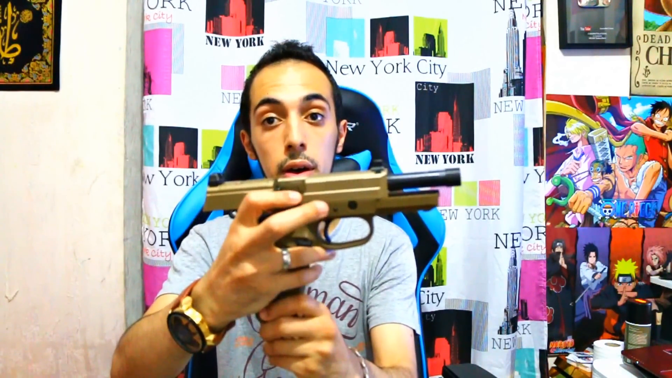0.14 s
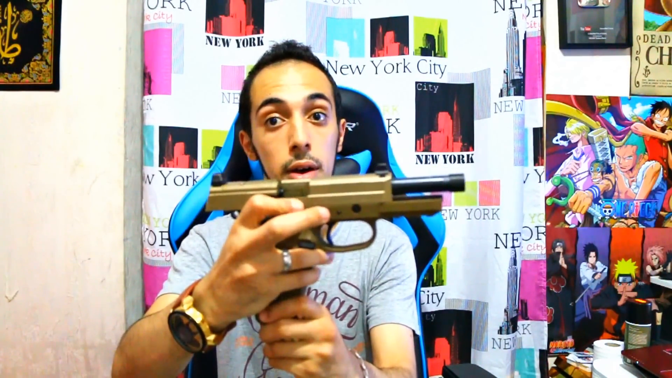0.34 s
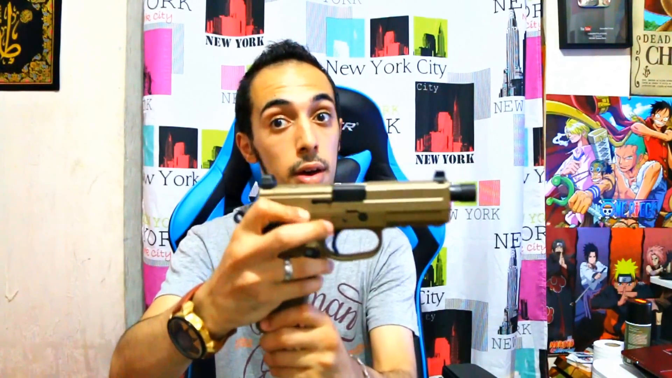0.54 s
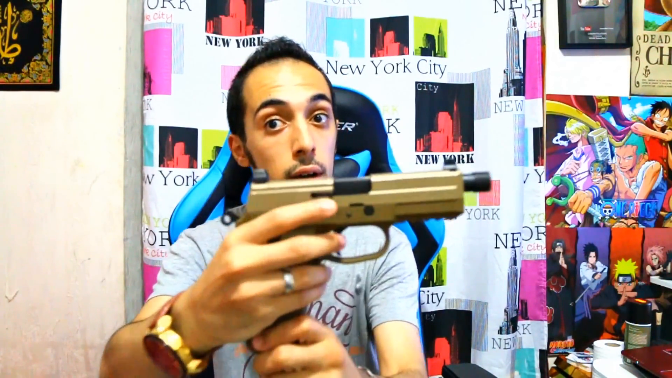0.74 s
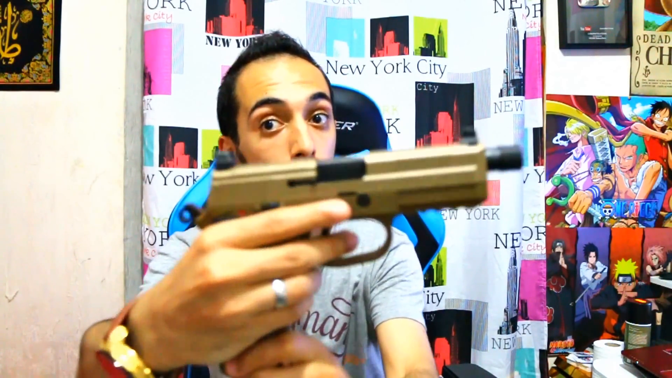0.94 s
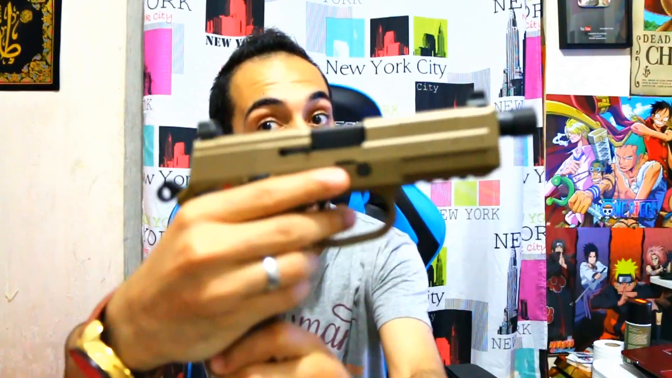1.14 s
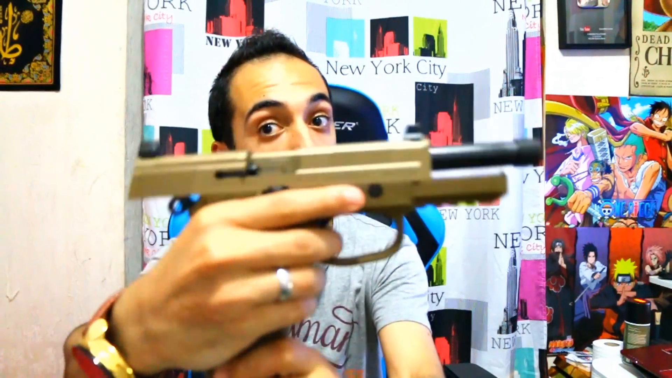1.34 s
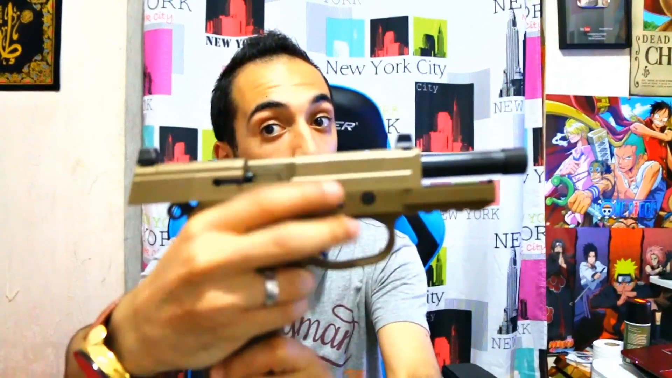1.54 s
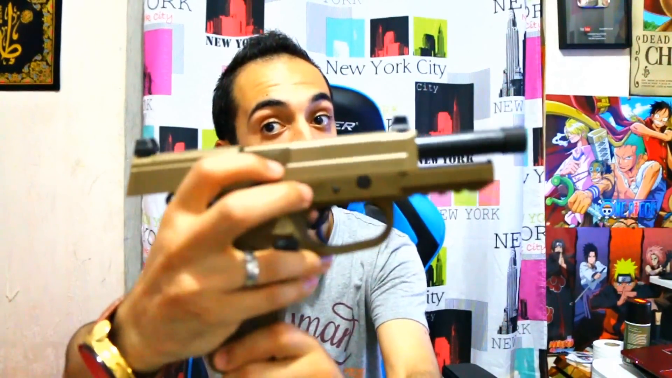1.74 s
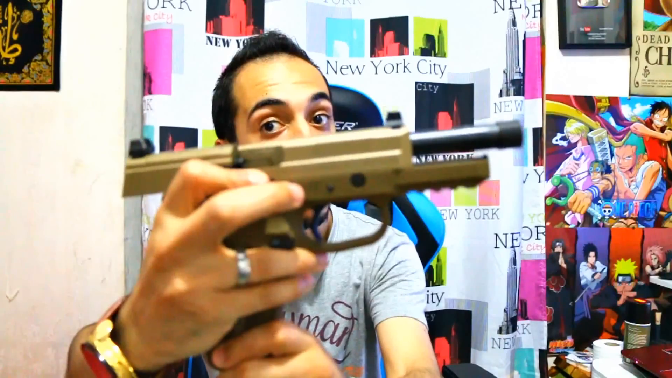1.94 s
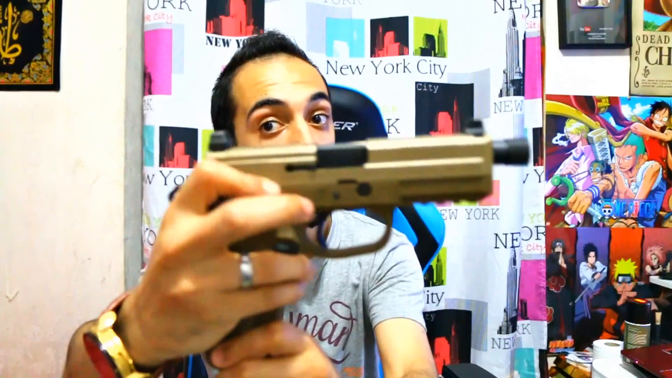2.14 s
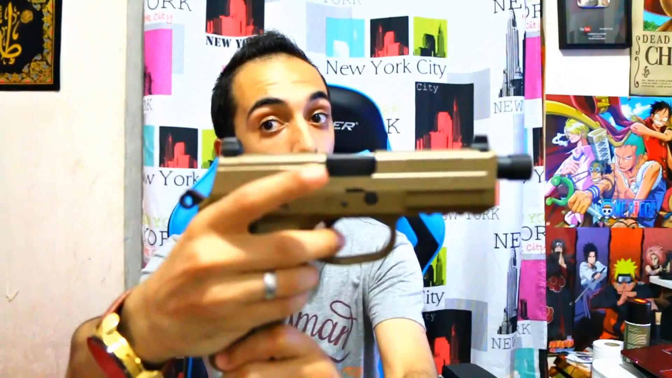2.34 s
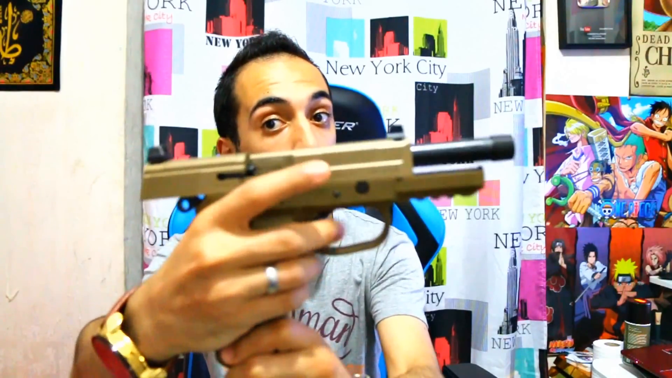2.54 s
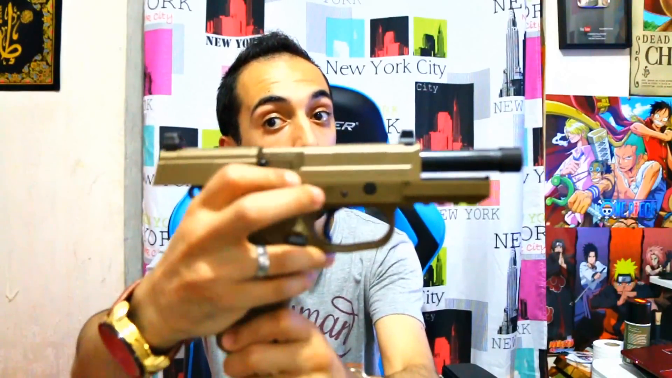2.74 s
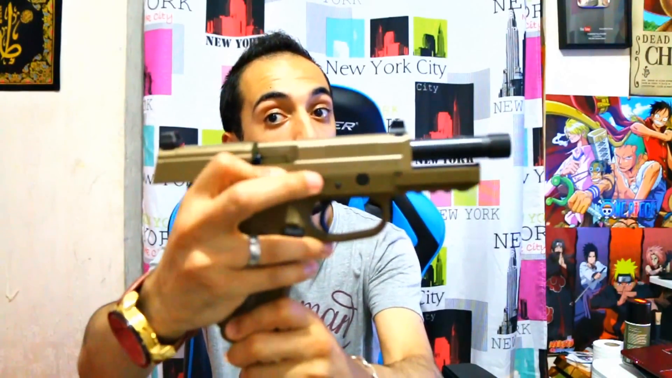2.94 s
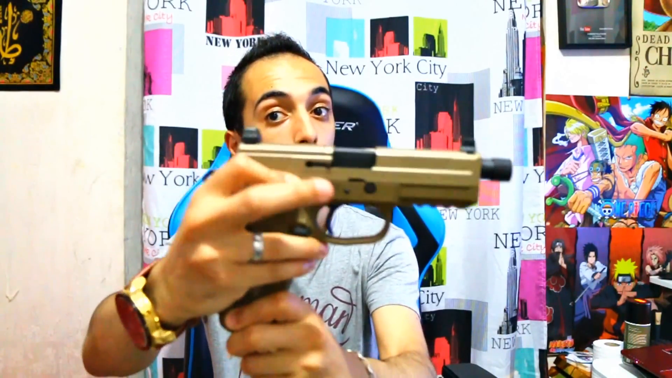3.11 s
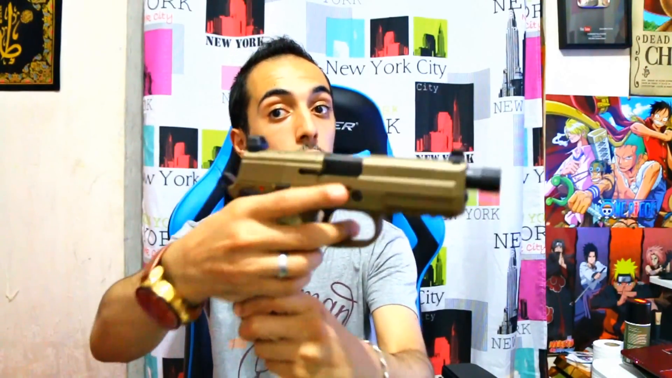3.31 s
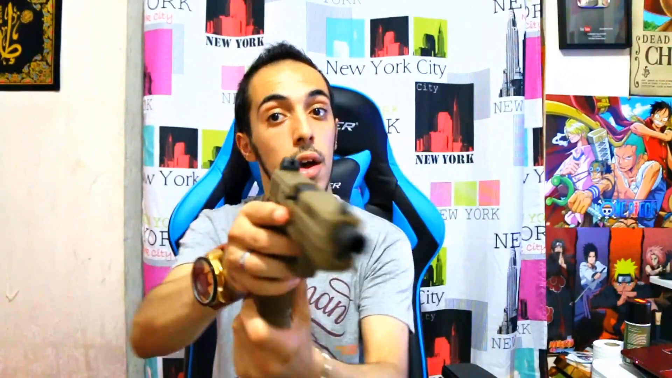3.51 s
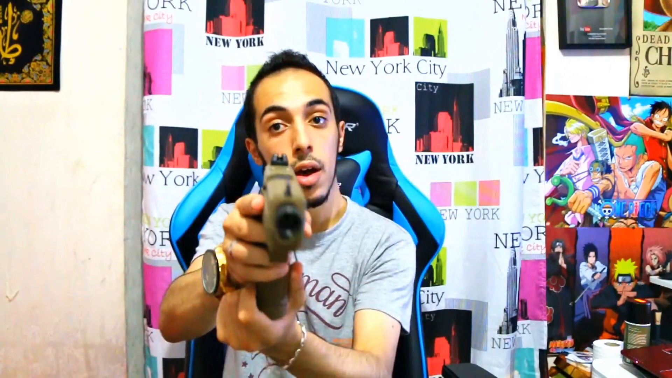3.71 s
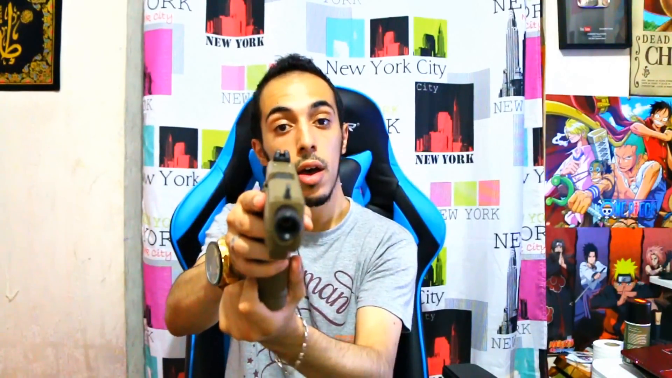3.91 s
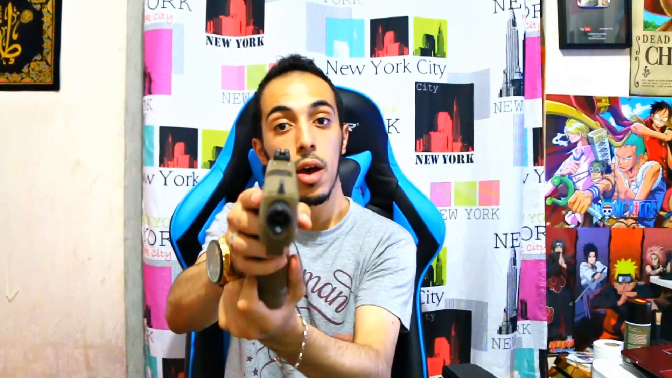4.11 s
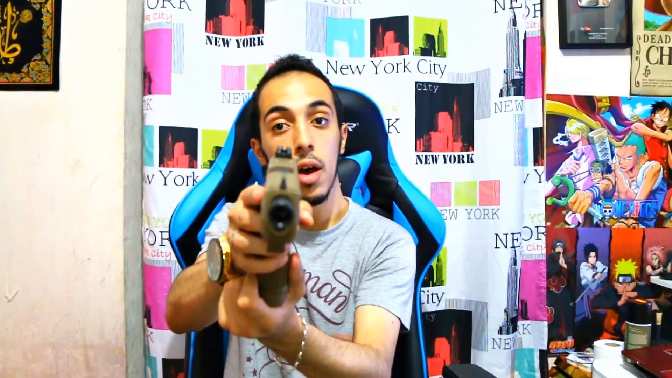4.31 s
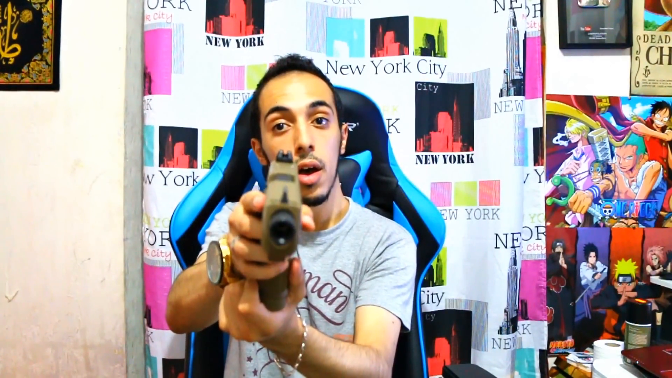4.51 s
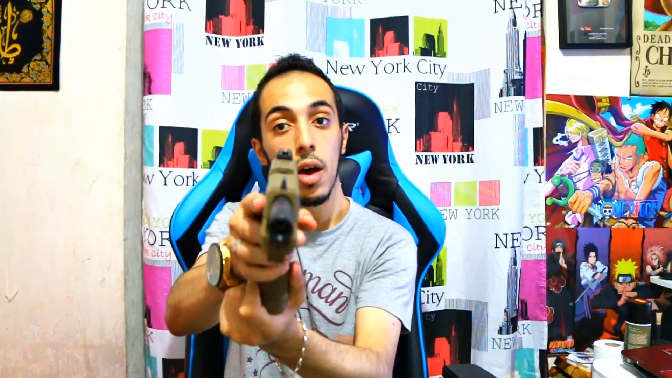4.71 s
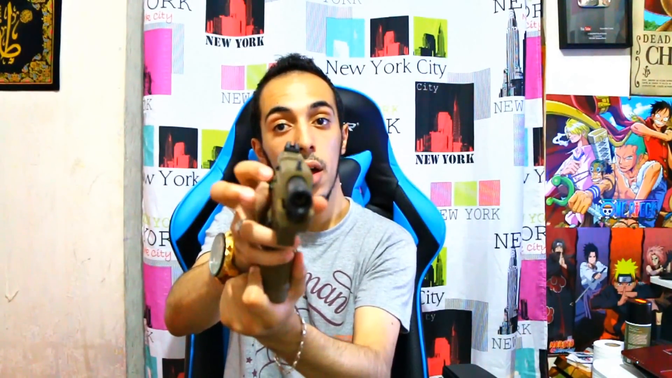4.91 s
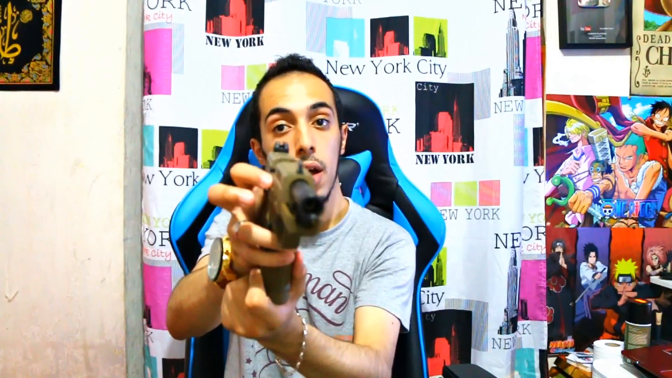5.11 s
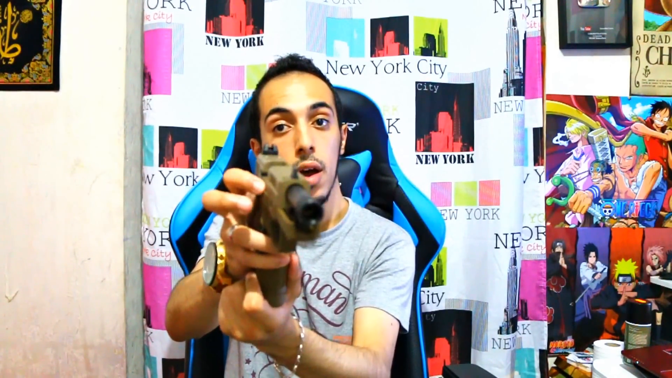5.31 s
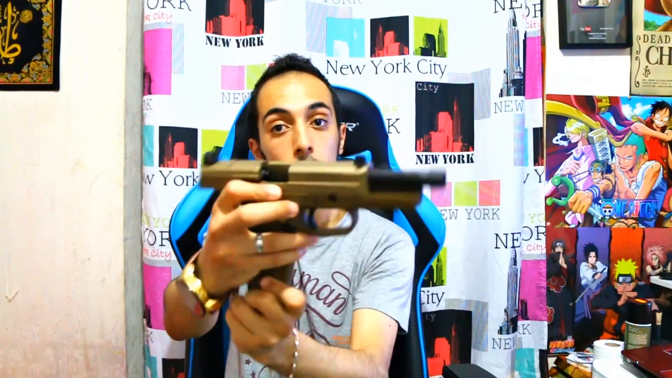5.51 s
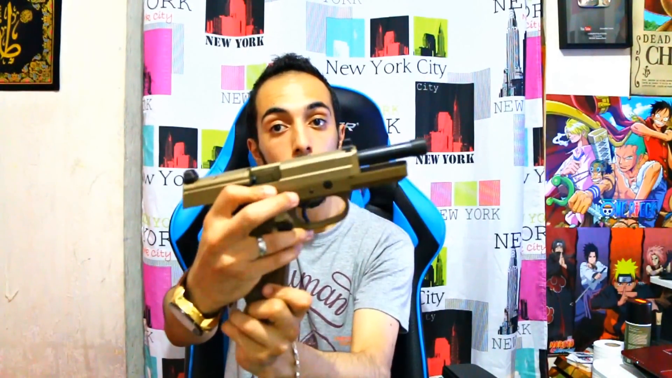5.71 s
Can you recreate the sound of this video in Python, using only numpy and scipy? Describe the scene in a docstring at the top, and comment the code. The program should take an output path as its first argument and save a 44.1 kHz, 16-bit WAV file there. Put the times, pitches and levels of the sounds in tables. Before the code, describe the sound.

A gas airsoft pistol is racked and fired three times in a small room, with loud distorted pops, metallic slams and short echoes.

```python
"""A gas-powered airsoft pistol is racked and fired three times, close to a microphone in a small room.
Each shot is a burst of coloured noise with a ringing barrel and a low push of air, and the slide cycles.
Racking scrapes the slide forward until it slams home: noise cracks, with steel ringing as dying sines.
Trigger, hammer and small parts click. The loud blows overload the microphone.
Small handling noises come in between, over a faint mains hum and still air; the room adds echoes."""
import sys
import numpy as np
from scipy import signal
from scipy.fft import rfft, irfft
from scipy.io import wavfile

SR = 44100
rng = np.random.default_rng(int(sys.argv[2]) if len(sys.argv) > 2 else 0)


def master_out(mix):
    """Clip the mix to full scale and print it as 16-bit PCM to the path in sys.argv[1]."""
    frames = np.transpose(np.atleast_2d(mix))
    ceiling = np.clip(frames, -1, 1)
    pcm = np.round(ceiling * 32767).astype(np.int16)
    wavfile.write(sys.argv[1], SR, pcm)


N = 253573  # length of the scene in samples
TOP_HZ = 16000
HAMMER_S = .009  # the hammer swings for this long before each shot

# The shots: gas burst t/s, blast level/dB, decay/s, relative low thump level/dB,
# trigger break t/s, relative trigger level/dB
SHOTS = [(1.4239, 4, 0.0079, -2.5, 1.4012, -27), (2.506, 5, 0.0063, -4.5, 2.4782, -28),
         (4.7227, 2, 0.0096, -4.5, 4.6952, -35)]
# The slide is let go and runs home: closing t/s, length of the run/s, relative rattle level/dB,
# barrel lock level/dB, slam level/dB, relative steel ring level/dB
RACKS = [(0.553, .0488, -2, -11.5, 2.5, -7), (2.1865, .049, 3, -19, 2, -2.5),
         (3.1296, .0525, 0, -10, 0.5, -10.5)]
# Tone of the bright snap where metal meets metal: f/Hz, relative level/dB
SNAP = [(100, -25.5), (2000, -4), (4500, -0.5), (7000, -0.5), (10000, -5), (14000, -3.5), (16000, -6)]
# How well the walls return each pitch: f/Hz, level/dB
WALLS = [(50, -19.5), (150, -10), (400, -4.5), (700, -2), (1000, 0), (3500, 2), (6000, 0), (11000, -4.5),
         (16000, -5.5)]


def gas(barrel_db=16, standing_db=7):
    """The valve lets out a burst of gas; it rings the barrel, shoves the air and wakes standing waves."""
    # Tone of the escaping gas: f/Hz, relative level/dB
    gas_tone = [(40, -19), (150, -8), (280, -3), (430, 3.5), (680, -5), (1100, 0), (1700, 2), (2300, -4),
                (3400, 1.5), (5000, -13.5), (8000, -12.5), (12000, -13), (16000, -20)]
    # Ringing of the barrel: f/Hz, relative level/dB, time to fall 60 dB t60/s
    barrel_modes = [(447, -4, 0.03), (804, -6, 0.11), (1066, 5.5, 0.12), (1476, -6.5, 0.21),
                    (1497, -3.5, 0.14), (1680, -1.5, 0.14), (1800, -4, 0.092), (2460, -8.5, 0.08),
                    (2780, -8.5, .09), (3040, -6.5, 0.12), (3746, -16, 0.22)]
    # Low push of the blast: f/Hz, level against the thump/dB, decay/s
    puff = [(30, -14, 0.021), (69, -4, .009), (135, -1.5, 0.011), (211, -2.5, 0.014), (426, 2.5, 0.0054)]
    # Standing waves of the room: f/Hz, relative level/dB, t60/s
    room_modes = [(109, -11.5, .25), (186.3, -0.5, 0.38), (235, -6, 0.46), (350, -7.5, 0.083),
                  (504, -7.5, 0.073)]
    jet, body = np.zeros((2, N))
    for s, db, decay, thump_db, *_ in SHOTS:
        add(jet, s, undb(db) * burst(decay, gas_tone))
        add(body, s, undb(db + barrel_db) * ring(barrel_modes, scatter=0.0032))
        push = sum(undb(thump_db + share_db) * thump(hz, fade) for hz, share_db, fade in puff)
        add(body, s, push)
        add(body, s, undb(thump_db + standing_db) * ring(room_modes))
    return jet, body


def slams(steel_db=13, jolt_hz=70, jolt_db=-32, jolt_decay=.0065):
    """The slide hits a stop with a broad crack and the steel rings on; closing also jolts the pistol."""
    # Tone of the crack: f/Hz, relative level/dB
    slide_tone = [(40, -32.5), (250, -21), (600, -14.5), (1150, -5), (1900, 1), (2600, -2.5), (3400, 6.5),
                  (4700, -13), (6400, -6), (9000, -10.5), (13000, -13.5), (16000, -18.5)]
    # Ringing of the steel: f/Hz, relative level/dB, t60/s
    steel_modes = [(2519, -11.5, .07), (3270, -5.5, 0.083), (3200, -0.5, 0.15), (3273, -5, 0.29),
                   (3380, -2.5, 0.21), (3344, 3.5, 0.043), (3580, -4, 0.072), (3550, -5.5, 0.29),
                   (4080, -12.5, .12), (6580, -8.5, 0.13)]
    crack, steel = np.zeros((2, N))
    for s, db, decay, ring_db in slide_blows():
        add(crack, s, undb(db) * burst(decay, slide_tone))
        add(steel, s, undb(db + ring_db + steel_db) * ring(steel_modes, scatter=0.014))
    for s, *_, db, _ in RACKS:
        add(crack, s, undb(db + jolt_db) * thump(jolt_hz, jolt_decay))
    return crack, steel


def slide_blows():
    """A racked slide slams and bounces; a fired one hits both stops: (t/s, level/dB, decay/s, ring/dB)."""
    # Gas throws the slide to its rear stop, the spring brings it back: delay after the shot/s, level/dB
    blowback = [(.0098, 4), (0.0169, 2)]
    slam_decay, blowback_decay, blowback_ring_db = 0.0023, 0.0054, -10  # s, s, dB
    # the closing slide bounces once, with a shorter crack and a weaker ring
    bounce_s, bounce_db, bounce_decay, bounce_ring_db = .0047, 0, 0.0014, -5
    blows = []
    for s, _, _, _, db, ring_db in RACKS:
        blows.append((s, db, slam_decay, ring_db))
        blows.append((s + bounce_s, db + bounce_db, bounce_decay, ring_db + bounce_ring_db))
    for s, *_ in SHOTS:
        blows += [(s + delay, db, blowback_decay, blowback_ring_db) for delay, db in blowback]
    return blows


def action(frame_db=15, sear_db=16, sear_snap_db=-23, snap_decay=0.00058, lock_decay=.0018, lock_lead=0.0038):
    """Small parts click through the frame with a bright snap; the barrel locks just before closing."""
    # Lone clicks as the slide is held back or settles and the trigger resets:
    # t/s, relative body level/dB, snap level/dB
    lone_clicks = [(.4823, -52.5, -63), (1.589, -20.5, -18), (2.3228, -33, -33), (2.6462, -16.5, -21)]
    # Ringing of the frame under a small click: f/Hz, relative level/dB, t60/s
    frame_modes = [(1157, -11, 0.003), (1660, -2.5, 0.016), (1897, 1.5, .011), (2334, -8.5, 0.0031),
                   (3433.1, -1, .009), (3997, -5.5, 0.013)]
    # Ringing as the trigger breaks: f/Hz, relative level/dB, t60/s
    sear_modes = [(1420, -1.5, .016), (1650, 0.5, .018), (2316, -12.5, .01), (3400, -9, 0.014)]
    # Tone of the barrel locking: f/Hz, relative level/dB
    lock_tone = [(60, -31.5), (500, -19.5), (1100, 5), (1900, -2), (3500, -9), (6000, -24), (16000, -39.5)]
    out = np.zeros(N)
    for s, body_db, snap_db in part_clicks() + list(lone_clicks):
        add(out, s, undb(body_db + frame_db) * ring(frame_modes, scatter=.04))
        add(out, s, undb(snap_db) * burst(snap_decay, SNAP))
    for *_, s, db in SHOTS:
        add(out, s, undb(db + sear_db) * ring(sear_modes, scatter=0.017))
        add(out, s, undb(db + sear_snap_db) * burst(snap_decay, SNAP))
    for s, _, _, db, *_ in RACKS:
        add(out, s - lock_lead, undb(db) * burst(lock_decay, lock_tone))
    return out


def part_clicks():
    """Parts touch as the slide runs and the hammer swings: (t/s, relative body level/dB, snap level/dB)."""
    # What the slide trips on in every run (catch, end of the notch, hammer, feed lip):
    # share of the run, relative body level/dB, relative snap level/dB
    run_stops = [(0, -19, -27.5), (0.069, -19, -23.5), (0.391, -18.5, -22), (.86, -27.5, -15.5)]
    # The hammer leaves the sear, then meets the valve striker:
    # share of the swing, relative body level/dB, snap level/dB
    hammer_stops = [(0, -31, -35.5), (0.419, -24.5, -32.5)]
    # the running slide also chatters at random
    chatter_per_s, chatter_db, chatter_snap_db, chatter_spread_db = 130, -28.5, -30.5, 2.5
    clicks = []
    for s, run, db, *_ in RACKS:
        for share, body_db, snap_db in run_stops:
            clicks.append((s - run * (1 - share), db + body_db, db + snap_db))
        for at, luck in scattered(s - run, s, chatter_per_s):
            force_db = db + chatter_spread_db * luck
            clicks.append((at, force_db + chatter_db, force_db + chatter_snap_db))
    for s, *_ in SHOTS:
        for share, body_db, snap_db in hammer_stops:
            clicks.append((s - HAMMER_S * (1 - share), body_db, snap_db))
    return clicks


def rails(snap_db=-9, grain_db=5):
    """Metal slides on metal, catching and slipping about once a millisecond."""
    # Tone of the scrape: f/Hz, relative level/dB
    rail_tone = [(60, -39), (500, -29), (1100, -9.5), (1800, 2.5), (2600, -8.5), (3600, -1.5),
                 (5000, -21.5), (16000, -41.5)]
    grip = np.repeat(rng.standard_normal(N // 44 + 1), 44)[:N]  # a new value every 44 samples
    scrape = unit(rng.standard_normal(N) * undb(grain_db * grip)) * np.sqrt(N)
    t = np.arange(N) / SR
    loudness = sum(undb(db) * ((t > start) & (t < end)) for start, end, db in rubs())
    scrape = scrape * loudness
    return colour(scrape, rail_tone) + undb(snap_db) * colour(scrape, SNAP)


def rubs(scrape_db=-36, hammer_rub_db=-40):
    """The slide rubs while it runs, the hammer while it swings: (start/s, end/s, level/dB)."""
    slide_rubs = [(s - run, s, db + scrape_db) for s, run, db, *_ in RACKS]
    hammer_rubs = [(s - HAMMER_S, s, hammer_rub_db) for s, *_ in SHOTS]
    return slide_rubs + hammer_rubs


def handling(below_db=-13, above_db=-16, top_db=-45, sag=4):
    """Dull creaks of the grip are short noises; soft bumps swell, fade and sink in pitch."""
    # The grip ticks and creaks in the hands: t/s, level/dB, f/Hz, decay/s
    grip_creaks = [(.797, -57.5, 595.5, 0.013), (3.556, -53.5, 1840, 0.013), (3.634, -54, 1690, 0.0078),
                   (3.6646, -42.5, 1830, 0.0025), (3.6995, -49.5, 1850, 0.0029),
                   (4.096, -56.5, 1050, 0.0047), (5.578, -50.5, 1400, .005)]
    # Soft bumps as the arms swing round: t/s, peak level/dB, starting f/Hz, time to the peak/s
    bumps = [(3.398, -43, 239.3, 0.0074), (3.412, -45, 201, 0.005), (3.426, -53.5, 162, 0.0078),
             (3.632, -57, 220, 0.0099)]
    out, t = np.zeros(N), np.arange(SR // 5) / SR
    for s, db, hz, decay in list(grip_creaks) + faint_creaks():
        creak_tone = [(hz / 4, below_db), (hz, 0), (hz * 2, above_db), (TOP_HZ / 2, top_db)]
        add(out, s, undb(db) * burst(decay, creak_tone))
    for s, db, hz, rise in bumps:
        phase = 2 * np.pi * np.cumsum(hz * np.exp(-sag * t)) / SR
        swell = t / rise * np.exp(1 - t / rise)
        add(out, s, undb(db) * np.sin(phase) * swell)
    return out


def faint_creaks(pitch_spread=0.12, per_s=11, db=-60, middle_hz=1430, decay=0.012):
    """Fingers settle on the grip at chance moments: (t/s, level/dB, f/Hz, decay/s)."""
    # Times when the grip is changed: start t/s, end t/s
    regrips = [(.98, 1.15), (3.699, 3.7)]
    return [(s, db, middle_hz * np.exp(pitch_spread * luck), decay)
            for start, end in regrips
            for s, luck in scattered(start, end, per_s)]


def echoes(x):
    """The desk and the near walls each throw back a single weaker copy."""
    # Desk and near walls: delay/s, level/dB
    reflections = [(.0062, -16), (0.0128, -15)]
    out = np.zeros(N)
    for delay, db in reflections:
        add(out, delay, undb(db) * x)
    return out


def room(x, gap=.003, build=0.0047, late_db=-21, late_stretch=1.8, order=2):
    """Each half octave of the room stores the energy put into it and gives it back as dying noise."""
    # How long the room rings: f/Hz, t60/s
    room_t60 = [(100, 0.28), (500, .19), (1500, 0.23), (3500, .225), (7000, 0.23), (15000, 0.19)]
    out, noise = np.zeros(N), rng.standard_normal((2, N))
    x = x + 1e-9 * noise[0]  # inaudible, so that no band is fully silent
    for k, hz in enumerate(106 * 2 ** (np.arange(15) / 2)):
        edges = [hz / 2 ** .25, hz * 2 ** .25]
        band = signal.butter(order, edges, "band", fs=SR, output="sos")
        power = linger(signal.sosfilt(band, x) ** 2, build)
        life = along(room_t60, hz) / np.log(10 ** 6)  # from t60 to the decay of power
        # a little of the sound runs on between the bare walls
        stored = linger(power, life) + undb(late_db) ** 2 * linger(power, life * late_stretch)
        hiss = unit(signal.sosfilt(band, noise[k % 2]))
        add(out, gap, undb(along(WALLS, hz)) * np.sqrt(stored * N) * hiss)
    return out


def background(air_db=-72.5):
    """Mains hum, a sum of steady sines, over the still air of the room, a soft coloured noise."""
    # Mains hum: f/Hz, average (rms) level/dB
    hum_tones = [(102.3, -83), (150.7, -75.5), (199.2, -73.5), (301.5, -79.5), (344.5, -87), (398.4, -89),
                 (500.6, -76.5), (672.9, -93.5)]
    # Tone of the still air: f/Hz, relative level/dB
    air_tone = [(25, -14.5), (60, -17), (130, -11), (250, -15.5), (450, -13), (700, -22), (1100, -19),
                (1450, -19), (2000, -24.5), (2800, -27), (3700, -22.5), (5500, -34.5), (15000, -39)]
    t = np.arange(N) / SR
    hum = sum(np.sqrt(2) * undb(db) * np.sin(2 * np.pi * (hz * t + rng.random())) for hz, db in hum_tones)
    return hum + undb(air_db) * colour(rng.standard_normal(N), air_tone)


def burst(decay, spectrum):
    """Coloured noise that starts at about level 1 and dies away."""
    t = np.arange(SR // 5) / SR
    fade = np.exp(-t / max(decay, 1 / SR))
    noise = colour(rng.standard_normal(len(t)) * fade, spectrum)
    return unit(noise) * np.sqrt(np.sum(fade ** 2))


def ring(modes, scatter=0):
    """A struck part rings as dying sines, unit energy in all; chance shifts each pitch by the scatter."""
    t = np.arange(SR // 2) / SR
    out = 0
    for hz, db, t60 in modes:
        pitch = hz * (1 + scatter * rng.standard_normal())
        wave = np.sin(2 * np.pi * (pitch * t + rng.random()))
        out = out + undb(db) * unit(wave * np.exp(-np.log(1000) * t / t60))
    # the contact takes a moment to press home
    return unit(out * (1 - np.exp(-t / 0.00051)))


def thump(hz, decay):
    """A heavily damped low swing."""
    t = np.arange(SR // 5) / SR
    return np.sin(2 * np.pi * hz * t) * np.exp(-t / decay)


def scattered(start, end, rate):
    """Chance moments, one in each equal slice of time, each with a chance value of spread 1."""
    count = max(1, round((end - start) * rate))
    moments = []
    for k, (u, v) in enumerate(rng.random((count, 2))):
        moments.append((start + (end - start) * (k + u) / count, np.sqrt(12) * (v - .5)))
    return moments


def colour(x, points, size=2048):
    """Filter with the given tone and no sound ahead of its cause; white noise keeps its level."""
    level_db = along(points, np.arange(size // 2 + 1) * SR / size)
    # folding the cepstrum packs the response towards its start (minimum phase)
    cepstrum = irfft(np.log(undb(level_db)))
    cepstrum[1:size // 2] *= 2
    cepstrum[size // 2 + 1:] = 0
    return convolve(x, unit(irfft(np.exp(rfft(cepstrum)))))


def convolve(x, response):
    """Pass a sound through an impulse response."""
    return signal.fftconvolve(x, response)[:len(x)]


def linger(power, seconds):
    """Spread power over a tail that dies away exponentially."""
    keep = np.exp(-1 / (seconds * SR))
    return signal.lfilter([1 - keep], [1, -keep], power)


def along(points, hz):
    """Read a value between (f/Hz, value) points, with pitch on a log scale."""
    f, value = np.transpose(points)
    return np.interp(np.log(np.maximum(hz, 1)), np.log(f), value)


def add(track, s, sound):
    """Mix a sound into a track at time s in seconds."""
    i = int(s * SR)
    track[i:i + len(sound)] += sound[:N - i]


def undb(db):
    """Turn decibels into a plain factor."""
    return 10 ** (np.asarray(db) / 20)


def unit(x):
    """Scale to unit energy."""
    return x / np.sqrt(np.sum(x ** 2))


def scene(gas_room_db=-2, metal_room_db=-10, ring_room_db=-11, ring_room_decay=0.045):
    """The muzzle blast fills the room more than the mechanism beside the microphone does."""
    jet, body = gas()
    crack, steel = slams()
    metal = crack + action() + rails() + handling()
    ringing = body + steel
    reverb = room(undb(gas_room_db) * jet + undb(metal_room_db) * metal)
    # ringing parts keep their pitch as they come back from the walls
    wall_response = unit(burst(ring_room_decay, WALLS))
    reverb = reverb + undb(ring_room_db) * convolve(ringing, wall_response)
    mix = jet + metal + ringing + echoes(jet + metal) + reverb + background()
    return mix[None]


def record(dry):
    """The microphone input clips at full scale, then a steep filter cuts the top."""
    clipped = np.clip(dry, -1, 1)
    top_cut = signal.ellip(8, .2, 70, TOP_HZ, fs=SR, output="sos")
    return signal.sosfilt(top_cut, clipped)


dry = scene()
out = record(dry)
master_out(out)
```